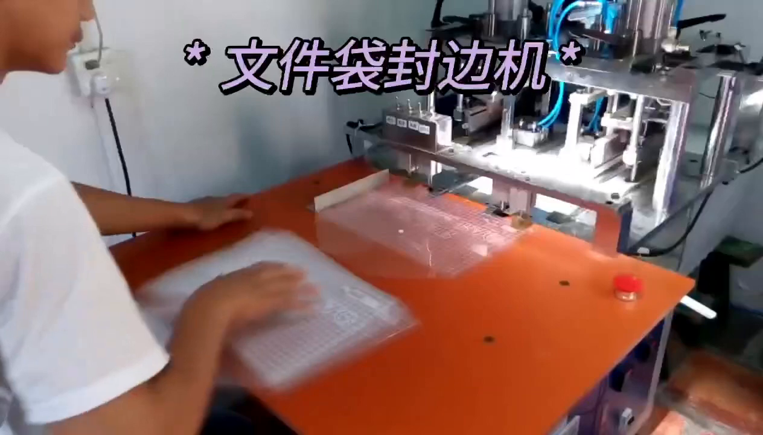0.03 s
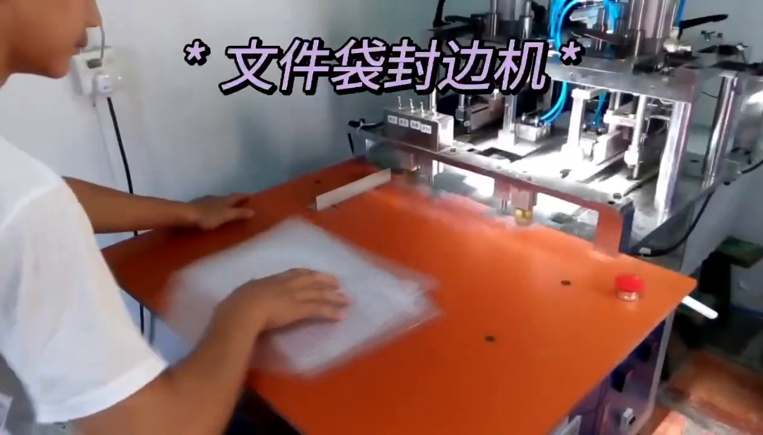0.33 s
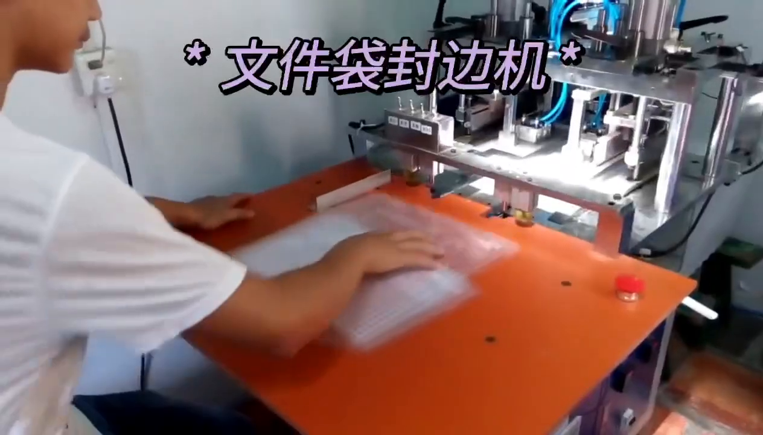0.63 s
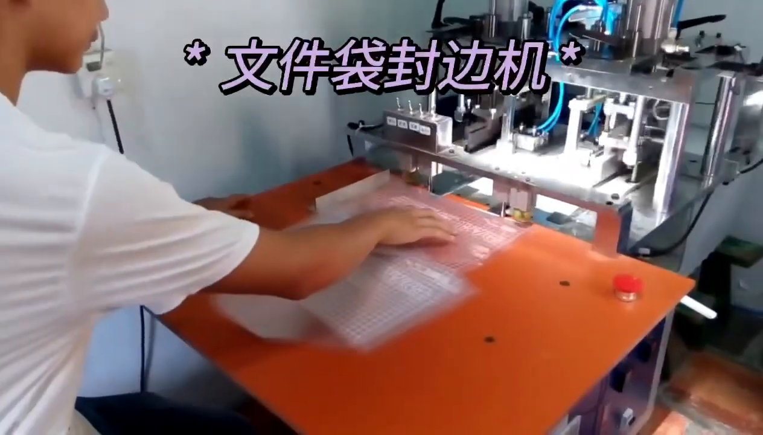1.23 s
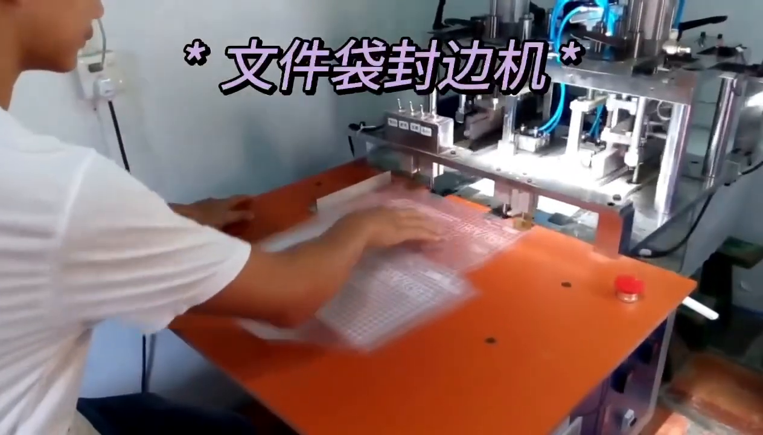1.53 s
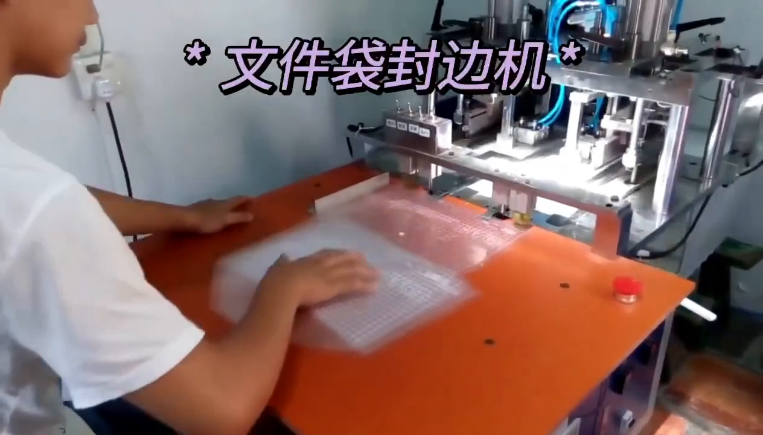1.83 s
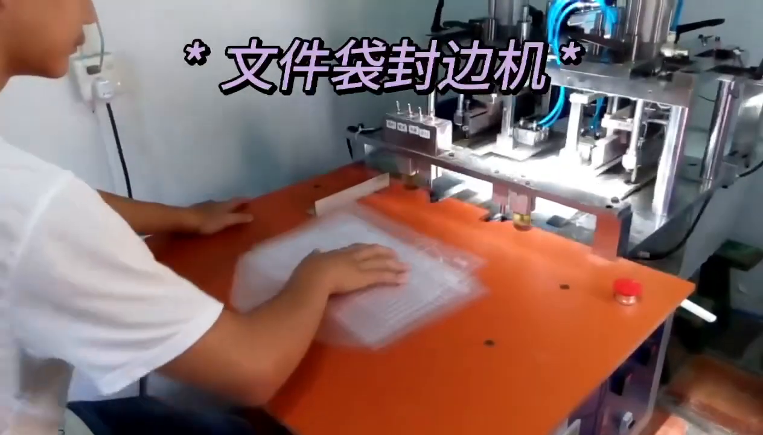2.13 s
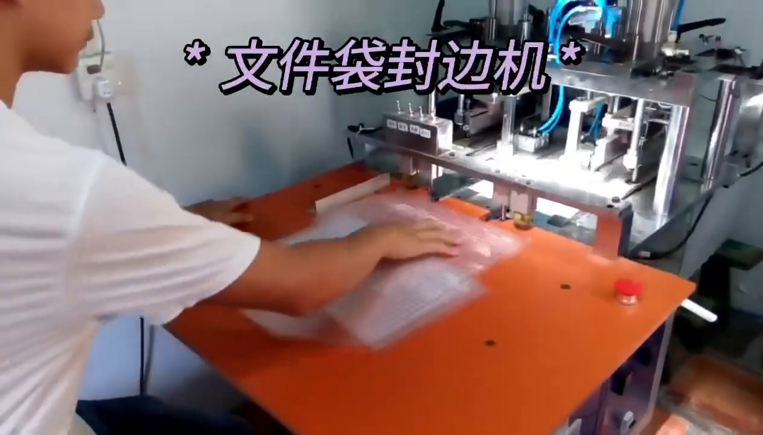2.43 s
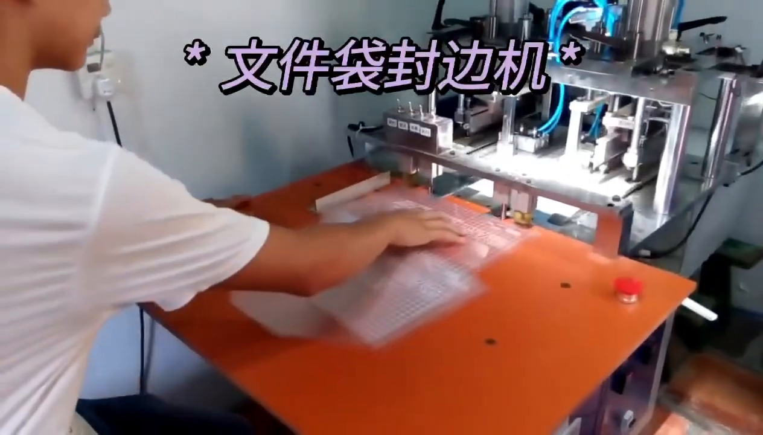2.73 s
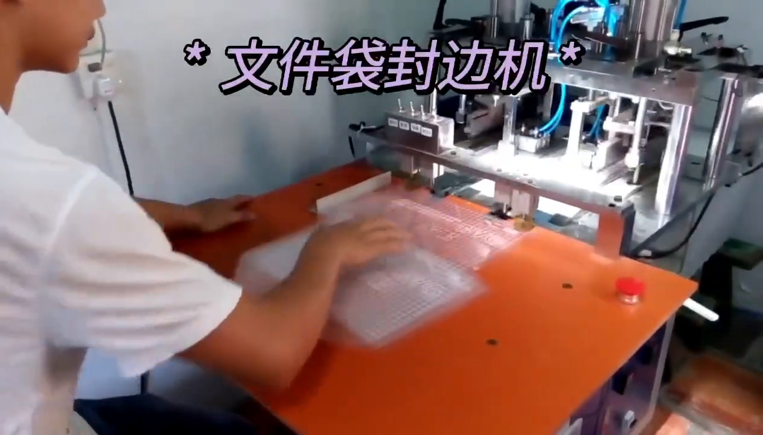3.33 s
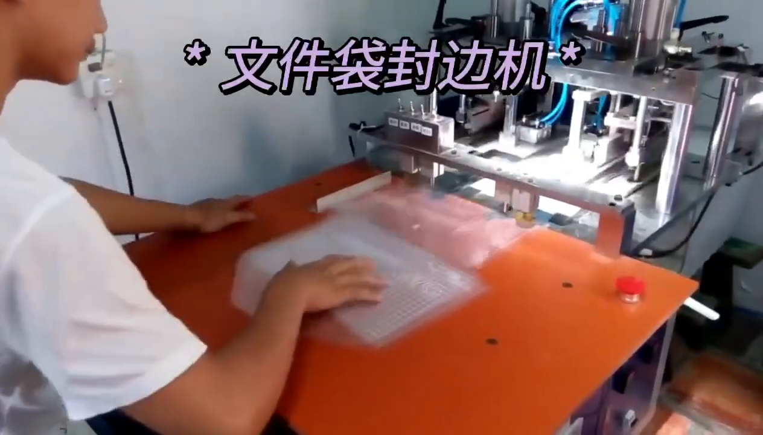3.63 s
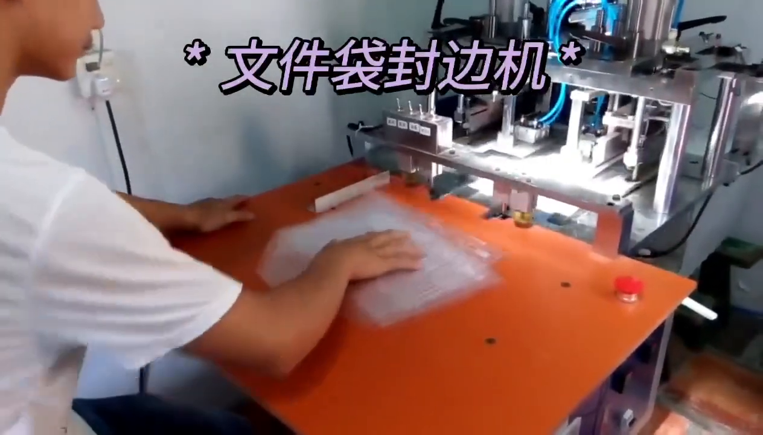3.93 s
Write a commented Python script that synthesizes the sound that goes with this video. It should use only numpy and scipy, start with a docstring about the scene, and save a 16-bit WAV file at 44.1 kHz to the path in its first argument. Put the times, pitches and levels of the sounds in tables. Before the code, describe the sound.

A pneumatic sealing machine hisses and clunks in repeating cycles over a low hum.

```python
"""A small hard workshop: a pneumatic bag sealer repeats its cycle over the hum of its transformer.
A valve spits, the steel frame knocks, air hisses from the silencers, the press clunks and the carriage
thumps home; the carriage runs along its rails while the next plastic bag slides over the table.
Impacts are noise bursts, the heavy ones with ringing modes; air and friction are shaped noise."""
import sys
import numpy as np
from scipy import signal
from scipy.fft import rfft, irfft
from scipy.io import wavfile

SR = 44100
rng = np.random.default_rng(int(sys.argv[2]) if len(sys.argv) > 2 else 0)


def to_wav(s):
    """Save 16-bit WAV."""
    ch = np.atleast_2d(s).T  # columns
    pcm = np.round(np.clip(ch, -1, 1) * 32767)  # PCM
    wavfile.write(sys.argv[1], SR, pcm.astype(np.int16))


N = 176400
T = np.arange(N) / SR

# machine cycle starts: t/s
CYCLE_STARTS_S = [-.962, .753, 2.465]


def undb(db):
    """Decibels to gain."""
    return 10 ** (np.asarray(db) / 20)


def unit(x):
    """Scale to rms 1."""
    return x / np.sqrt(np.mean(x ** 2))


def noise():
    """White noise."""
    return rng.standard_normal(N)


def walk(rate_hz):
    """Smooth random wander, rms 1."""
    return unit(np.interp(T * rate_hz, np.arange(8192), rng.standard_normal(8192)))


def fade(t60_s):
    """Exponential decay."""
    return undb(-60 * T / t60_s)


def convolve(x, response):
    """Filter by a response scaled to unit energy."""
    return signal.fftconvolve(x, response / np.linalg.norm(response))[:N]


def colour(x, spectrum, size=4096):
    """Minimum-phase filter through (f/Hz, level/dB) points; keeps the power of white noise."""
    hz, db = np.array(spectrum).T
    bins_hz = np.maximum(np.arange(size // 2 + 1) * SR / size, 1)
    gain = undb(np.interp(np.log(bins_hz), np.log(hz), db))
    cepstrum = irfft(np.log(gain))
    cepstrum[size // 2:] = 0
    return convolve(x, irfft(np.exp(2 * rfft(cepstrum))))


def resonance(hz, width_hz, drift=0):
    """Friction-driven resonance; pitch wanders by the fraction drift."""
    swell = convolve(noise() + 1j * noise(), T * np.exp(-np.pi * width_hz * T))
    phase = 2 * np.pi * np.cumsum(hz * (1 + drift * walk(14))) / SR
    return np.real(swell * np.exp(1j * phase))


def room(x, wet_db):
    """Direct sound plus diffuse tail; reflections shift as the operator moves."""
    def tail():
        white = noise()
        low = signal.sosfilt(signal.butter(2, 2500, fs=SR, output="sos"), white)
        response = low * fade(t60_s=0.38) + (white - low) * fade(t60_s=0.36)
        return convolve(x, response * (T > 0.004))
    turn = 2 * np.pi * T
    return x + undb(wet_db) * (np.cos(turn) * tail() + np.sin(turn) * tail())


def cycled(rows):
    """Repeat timed rows in every machine cycle."""
    return [(start + s, *rest) for start in CYCLE_STARTS_S for s, *rest in rows
            if 0 <= start + s < N / SR]


def blows(hits, shape):
    """A fresh, energy-normalised shape() at each (t/s, level/dB) hit."""
    out = np.zeros(N)
    for s, db in hits:
        start, blow = int(s * SR), shape()
        blow = blow * undb(db) * np.sqrt(SR / np.sum(blow ** 2))
        out[start:start + len(blow)] += blow[:N - start]
    return out


def cracks(hits, spectrum, rise_s, t60_s):
    """Short bursts of dense vibration."""
    envelope = (np.minimum(T / rise_s, 1) * fade(t60_s))[:SR // 2]
    return colour(blows(hits, lambda: envelope * rng.standard_normal(len(envelope))), spectrum)


def rings(hits, modes, scatter_db=1.8):
    """Decaying modes; sign and level vary per hit."""
    bank = np.array([(undb(db) * fade(t60_s) * np.sin(2 * np.pi * hz * T))[:SR // 2]
                     for hz, db, t60_s in modes])

    def strike():
        signs = rng.choice([-1, 1], len(bank))
        return (signs * undb(scatter_db * rng.standard_normal(len(bank)))) @ bank
    return blows(hits, strike)


def gates(rows, attack_s, release_s):
    """Envelopes of (t/s, length/s, level/dB) rows, added in power."""
    power = np.zeros(N)
    for s, length_s, db in rows:
        attack = 1 - np.exp(-np.maximum(T - s, 0) / attack_s)
        release = np.exp(-np.maximum(T - s - length_s, 0) / release_s)
        power += (undb(db) * attack * release) ** 2
    return np.sqrt(power)


def workshop(hum_hz=100):
    """Transformer hum and the steady wash of the shop."""
    harmonics = [(1, -35.5), (2, -75), (3, -44.5)]  # multiple, level/dB
    wash_spectrum = [(25, -15), (55, -30), (90, 5), (170, 2.5), (270, 0), (500, -2), (850, -9.5),
                     (1500, -20.5), (3000, -16.5), (6500, -6.5), (8500, -43), (14000, -35)]  # f/Hz, level/dB
    hum = sum(undb(db) * np.sqrt(2) * np.sin(2 * np.pi * k * hum_hz * T) for k, db in harmonics)
    wash = undb(-35 + 1.5 * walk(4.1)) * colour(noise(), wash_spectrum)
    return hum * undb(0.5 * walk(5.9)) + wash


def exhaust():
    """Turbulent air through the silencers; top fizz grows with flow squared."""
    vents = [(-.02, 0.035, -15), (.152, 0.038, -3.5), (.178, 0.052, -3), (.414, 0.15, 0), (.58, 0.075, -6),
             (.758, 0.013, -9.5), (.778, 0.13, -1), (.92, 0.051, -9), (.996, 0.034, -6.5), (1.06, 0.03, -9),
             (1.145, 0.05, -11), (1.402, 0.093, -12)]  # timed exhausts: t/s in cycle, length/s, level/dB
    bleeds = [(.0, 0.04, -12), (1.114, 0.031, -3.5), (2.782, 0.078, -5)]  # air let off between them: t/s, length/s, level/dB
    hiss_spectrum = [(200, -33), (800, -31), (1400, -18.5), (2300, -9.5), (3200, -9.5), (5000, -6.5),
                     (6000, 0), (6600, 3), (7300, -3), (8100, -20), (10000, -27.5), (14000, -41)]  # f/Hz, level/dB
    fizz_spectrum = [(3000, -12), (7000, 3), (9000, 3), (11500, -1), (14000, -6)]  # f/Hz, level/dB
    flow = gates(cycled(vents) + bleeds, attack_s=0.0067, release_s=0.042)
    hiss = undb(-15.5 + 0.5 * walk(45)) * flow * colour(noise(), hiss_spectrum)
    fizz = undb(-26 + 2.4 * walk(110)) * flow ** 2 * colour(noise(), fizz_spectrum)
    flutter = undb(1.4 * walk(250))
    return room((hiss + fizz) * flutter, wet_db=-8.5)


def carriage_travel():
    """Gain of the sliding sounds as the carriage moves."""
    contour = [(0, -19.5), (.7, -0.5), (.8, -1.5), (.98, -0.5), (1.06, -5.5), (1.12, -42), (1.27, -13),
               (1.339, -1), (1.45, -1), (1.6, -1.5), (1.65, -15.5), (1.699, -5.5)]  # t/s in cycle, level/dB
    s, db = np.array(contour).T
    return sum(undb(np.interp(T - start, s, db)) * (T >= start) * (T < start + s[-1])
               for start in CYCLE_STARTS_S)


def rails(travel):
    """The carriage rasps along its rails and excites their resonances."""
    rasp_spectrum = [(100, -23.5), (260, 7), (520, -9), (750, 5), (1040, 1.5), (1220, -4.5), (1450, -1.5),
                     (2000, 0), (2700, -2), (3900, -6.5), (4600, -15), (7000, -6), (9000, -27),
                     (14000, -31)]  # f/Hz, level/dB
    rail_modes = [(870, 180, -3), (1397, 76, -2.5), (2567, 200, -0.5), (2810, 170, -3.5), (3810, 77, -1)]  # f/Hz, width/Hz, level/dB
    rasp = undb(-28.5 + 2 * walk(150)) * colour(noise(), rasp_spectrum)
    sing = sum(undb(db + 2 * walk(8.9)) * resonance(hz, width_hz, drift=0.004)
               for hz, width_hz, db in rail_modes)
    return travel * (rasp + undb(-34.5) * unit(sing))


def bag_crinkle(travel, clicks_per_s=140, spread_db=4):
    """The moving plastic crinkles in random clicks."""
    spectrum = [(500, -13), (2500, 5), (6500, -9), (8500, -9), (14000, -19)]  # f/Hz, level/dB
    clicks = (rng.random(N) < clicks_per_s / SR) * undb(spread_db * np.clip(noise(), -2, 2))
    return undb(-43.5) * travel * unit(colour(clicks, spectrum))


def bag_scuff():
    """The bag scuffs under the hand."""
    strokes = [(.0, 0.031, -11), (.05, 0.014, -3.5), (.112, 0.0069, -20), (2.785, 0.045, 6),
               (2.885, 0.032, 2.5), (2.96, 0.026, -14), (3.9, 0.022, -26)]  # t/s, length/s, level/dB
    spectrum = [(150, -8.5), (400, -0.5), (900, -2.5), (1500, -7.5), (2600, 4), (4000, -3.5), (7000, -7.5),
                (9000, -27), (14000, -57)]  # f/Hz, level/dB
    friction = colour(noise() * undb(2.7 * walk(400)), spectrum)
    return undb(-26.5) * gates(strokes, attack_s=0.00087, release_s=0.019) * friction


def bag_swish():
    """The bag's face swishes over the table."""
    strokes = [(0, 0.15, 7), (.46, 0.077, 5), (1.75, 0.15, -8), (2.17, 0.055, 5), (3.44, 0.14, 5),
               (3.89, 0.078, 7)]  # t/s, length/s, level/dB
    spectrum = [(3000, -27), (6600, 8), (8200, -1), (10000, 3), (14000, -18)]  # f/Hz, level/dB
    hiss = undb(-47 + 2 * walk(35)) * colour(noise(), spectrum)
    return gates(strokes, attack_s=0.012, release_s=0.012) * hiss


def valve_spits():
    """The valve spits short, bright bursts of air."""
    spits = [(.003, -2), (.010, -3.5), (.021, -22), (.191, -4), (1.017, -5.5)]  # t/s in cycle, level/dB
    spectrum = [(1000, -16), (3500, -11.5), (5500, -12.5), (6600, -1.5), (7200, 5.5), (7700, -1),
                (8400, -28.5), (14000, -25.5)]  # f/Hz, level/dB
    spit = undb(-37) * cracks(cycled(spits), spectrum, rise_s=0.00034, t60_s=0.04)
    return room(spit, wet_db=2.5)


def jaw_ticks():
    """The sealing jaw ticks as it lets go of the bag."""
    ticks = [(.181, -3), (1.893, 0.5), (1.901, -17), (3.615, -1), (3.622, -14)]  # t/s, level/dB
    spectrum = [(1500, -8.5), (4500, -7), (6800, 4.5), (8500, -14), (14000, -21)]  # f/Hz, level/dB
    tick = undb(-44.5) * cracks(ticks, spectrum, rise_s=0.0006, t60_s=0.03)
    return room(tick, wet_db=2.5)


def carriage_thumps():
    """The carriage hits its stop; the table rings."""
    hits = [(0.013, -10), (.136, -5), (.806, -6.5), (1.162, -0.5), (1.195, -3.5), (1.225, -7), (1.26, -7),
            (1.30, -9)]  # t/s in cycle, level/dB
    spectrum = [(60, -17), (150, -0.5), (300, 5), (470, -1), (650, 1.5), (850, 2), (1200, -8.5), (2300, -4),
                (4000, -28), (9000, -71)]  # f/Hz, level/dB
    table_modes = [(153.8, 0, 0.9), (257.7, -7, 0.43), (299, 1.5, 0.41), (375, -3.5, .2), (472, -4.5, 0.29),
                   (531, -11.5, 0.15), (637, -2.5, 0.19)]  # f/Hz, level/dB, t60/s
    thump = undb(-40.5) * cracks(cycled(hits), spectrum, rise_s=0.002, t60_s=0.14)
    return room(thump, wet_db=-1.5) + undb(-39.5) * rings(cycled(hits), table_modes)


def frame_knocks():
    """The steel frame knocks and rings."""
    hits = [(0.098, -6), (.109, 1), (.119, -6), (.187, -4.5), (.205, -6.5), (.425, -8.5), (.457, -5),
            (.594, -2), (.607, -12.5), (.623, -3.5), (0.638, -7), (0.653, -23), (1.19, -12.5)]  # t/s in cycle, level/dB
    spectrum = [(120, -30), (270, -16), (480, -15), (850, 0.5), (1300, -5.5), (2100, 2), (3600, -5.5),
                (4600, -10), (7000, -9.5), (8500, -23), (14000, -70)]  # f/Hz, level/dB
    frame_modes = [(862, -12, 0.2), (1258, -10.5, 0.2), (1460, -7, 0.14), (1805, -3, 0.15),
                   (1935, -0.5, 0.11), (2040, -7, 0.13), (2280, -7, 0.12), (2513, 4, 0.063),
                   (2990, -4, 0.12), (3180, -6, 0.095), (3548, -1.5, 0.097), (3790, -7.5, 0.15),
                   (4370, -10, 0.11)]  # f/Hz, level/dB, t60/s
    knock = undb(-34.5) * cracks(cycled(hits), spectrum, rise_s=0.0012, t60_s=0.071)
    return room(knock, wet_db=-1) + undb(-33.5) * rings(cycled(hits), frame_modes)


def bag_rub():
    """The bag rubs the table as it comes to rest."""
    strokes = [(.6, 0.075, 0.5), (2.33, 0.077, -3)]  # t/s, length/s, level/dB
    return undb(-30) * gates(strokes, attack_s=0.03, release_s=0.018) * resonance(hz=798, width_hz=190)


def bed_thuds():
    """The press bed rings low as the head lands and lifts."""
    hits = [(.110, -3), (.126, -3.5), (.632, -5), (.79, -7.5)]  # t/s in cycle, level/dB
    bed_modes = [(180.7, -8.5, 0.34), (254, -3.5, 0.34), (275.3, 1, 0.23)]  # f/Hz, level/dB, t60/s
    return undb(-39) * rings(cycled(hits), bed_modes)


def press_clunks():
    """The press clunks and rings."""
    hits = [(.112, -13.5), (0.133, -18), (.178, -19), (.203, -15), (.222, -15), (.455, -17), (.597, -4.5),
            (.622, -3), (.634, -5.5), (.654, -5), (0.699, -20), (.806, -14)]  # t/s in cycle, level/dB
    spectrum = [(60, -36), (150, -2.5), (220, -13.5), (300, 10.5), (400, -1), (550, -0.5), (1050, 0.5),
                (1350, -4.5), (1850, -4.5), (3000, -6), (5000, -13), (9000, -42)]  # f/Hz, level/dB
    press_modes = [(293, -4, 0.12), (400, -7, 0.23), (510.6, -5, 0.22), (630, -6, 0.16), (840, -5.5, 0.2),
                   (994, -3, 0.16), (1080, -2, 0.14), (1277, -6, 0.18), (1827, -2, 0.072)]  # f/Hz, level/dB, t60/s
    clunk = undb(-33) * cracks(cycled(hits), spectrum, rise_s=0.0018, t60_s=0.063)
    return room(clunk, wet_db=-0.5) + undb(-36.5) * rings(cycled(hits), press_modes)


def scene():
    """Workshop, machine and bag in mono."""
    travel = carriage_travel()
    sliding = rails(travel) + bag_crinkle(travel) + bag_scuff() + bag_swish() + bag_rub()
    impacts = jaw_ticks() + carriage_thumps() + frame_knocks() + bed_thuds() + press_clunks()
    return (workshop() + exhaust() + room(sliding, wet_db=-5.5) + valve_spits() + impacts)[None]


def record(dry):
    """Soft-clip the peaks, then low-pass."""
    headroom, top_hz = 1.25, 14000
    lowpass = signal.ellip(10, 0.2, 80, top_hz, fs=SR, output="sos")
    return signal.sosfilt(lowpass, headroom * np.tanh(dry / headroom))


dry = scene()
out = record(dry)
to_wav(out)
```